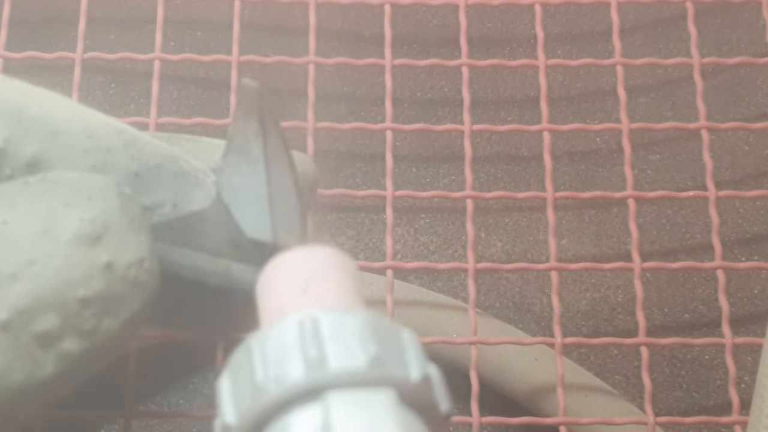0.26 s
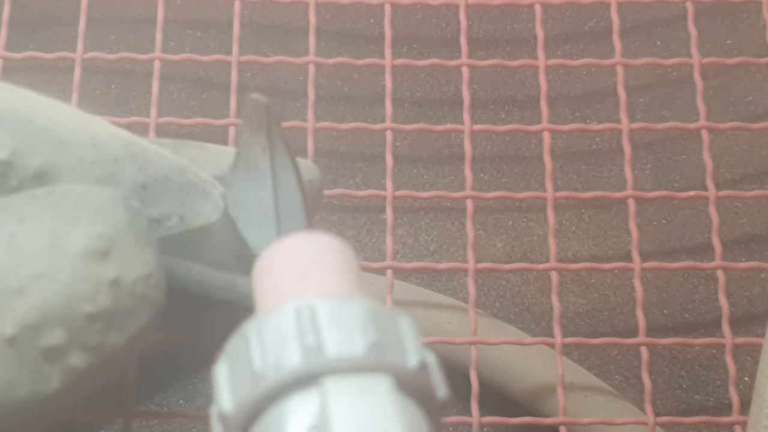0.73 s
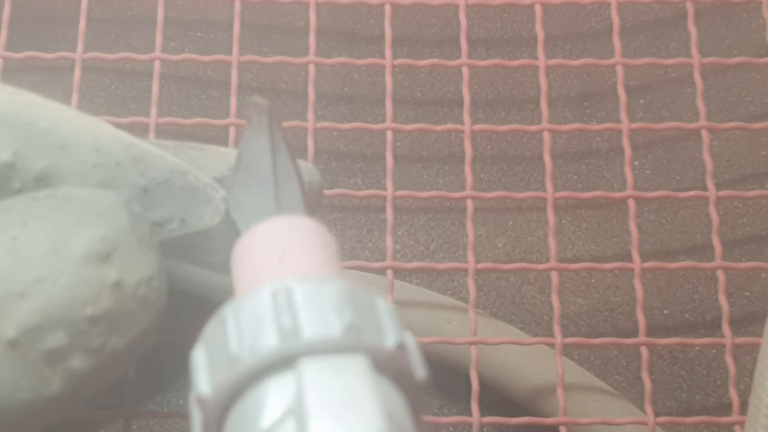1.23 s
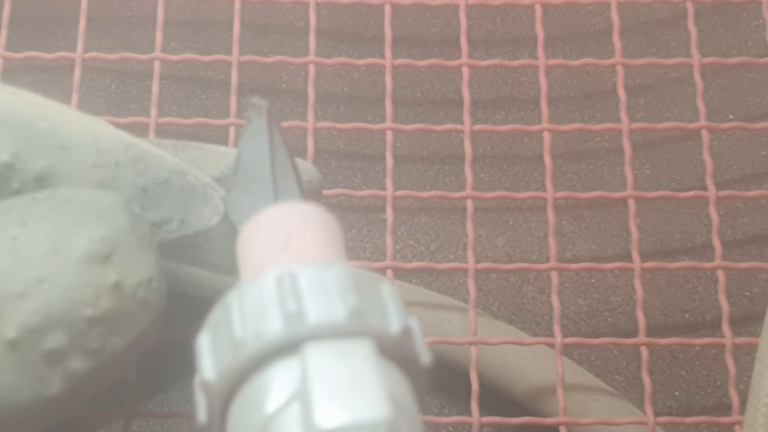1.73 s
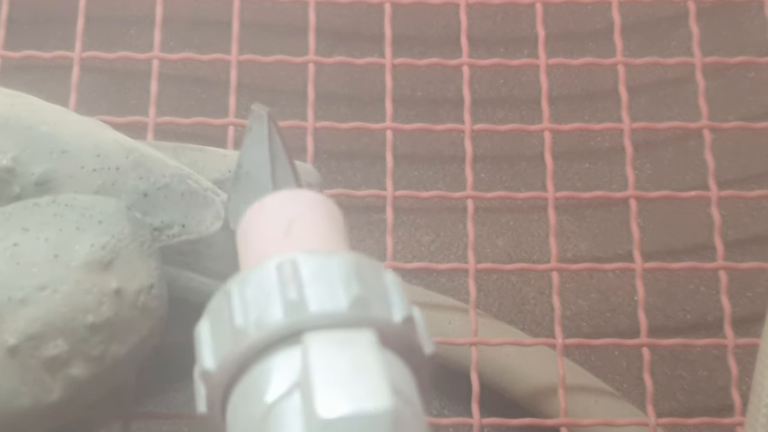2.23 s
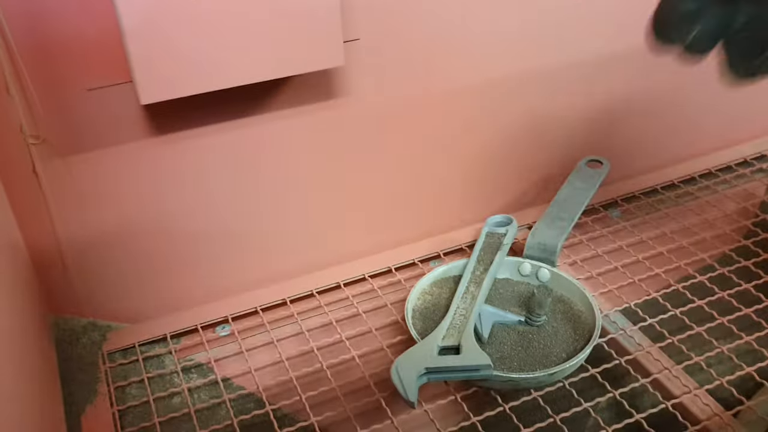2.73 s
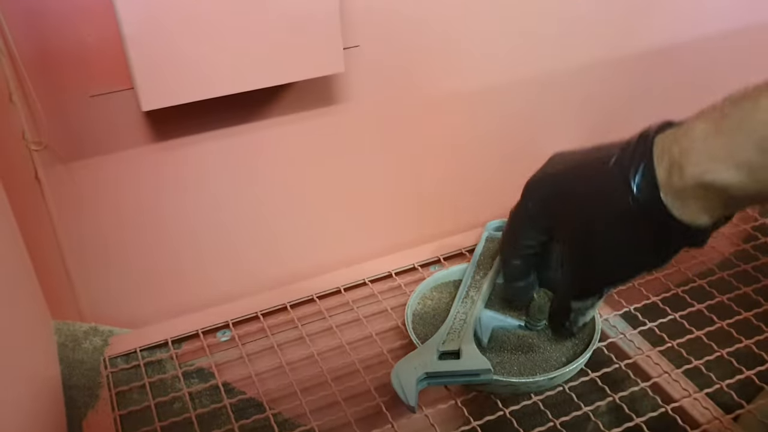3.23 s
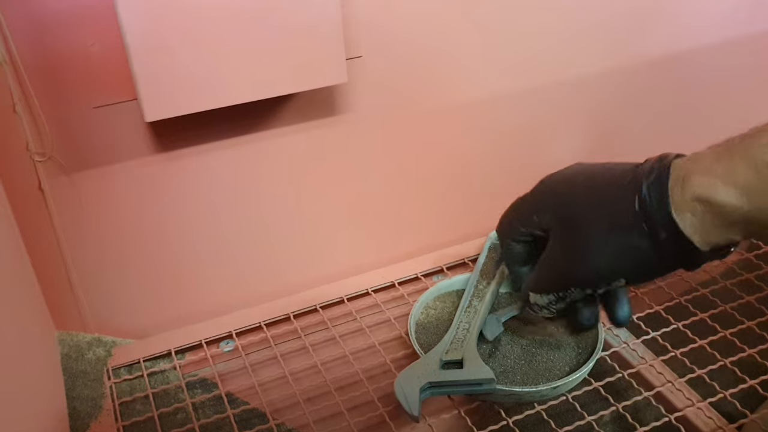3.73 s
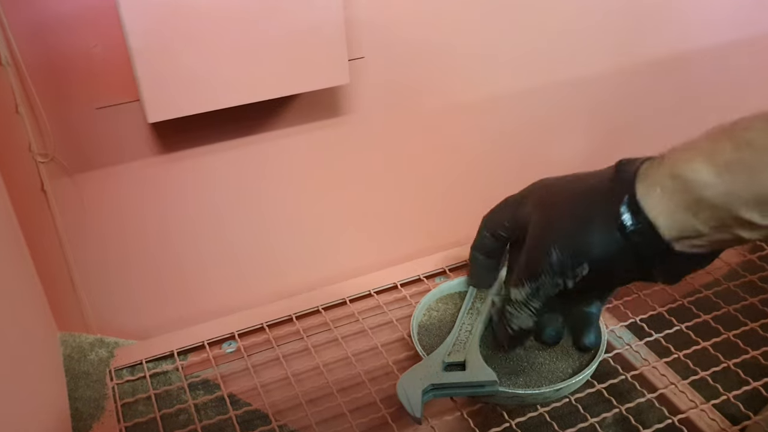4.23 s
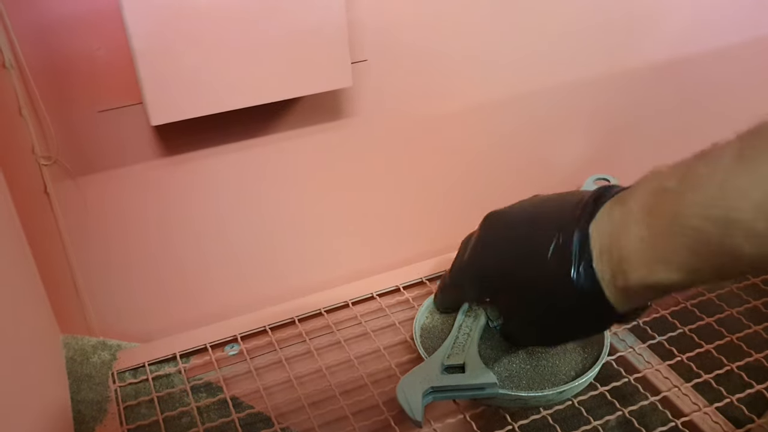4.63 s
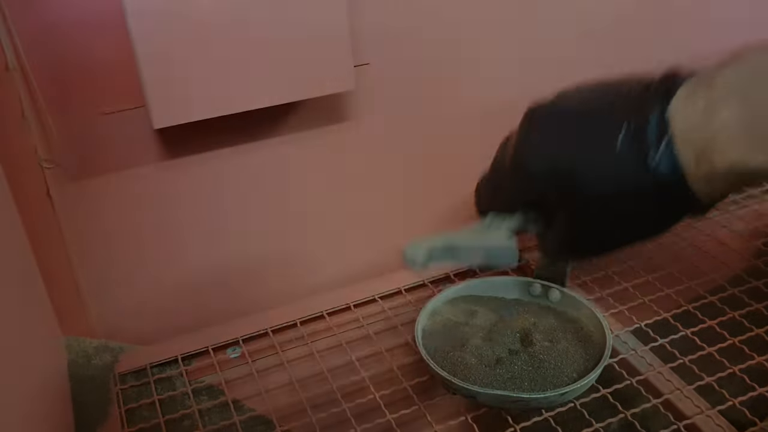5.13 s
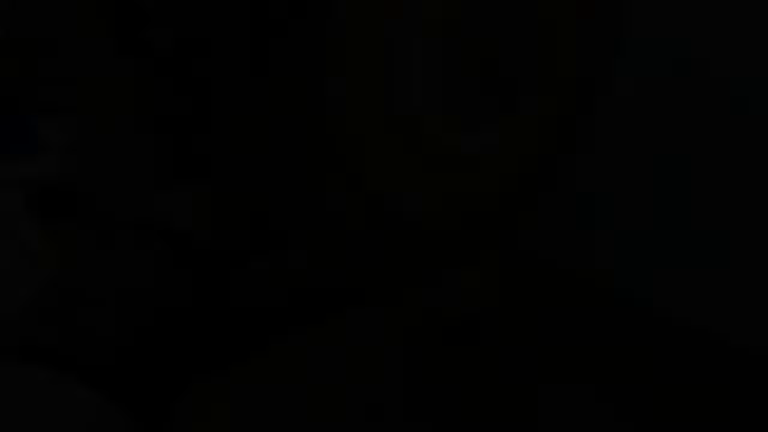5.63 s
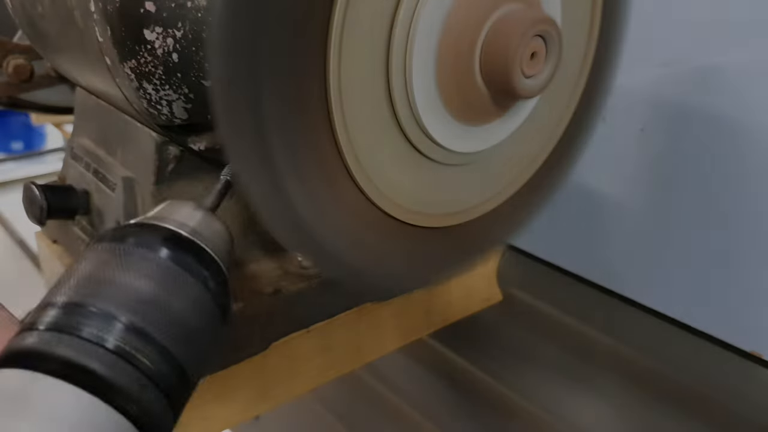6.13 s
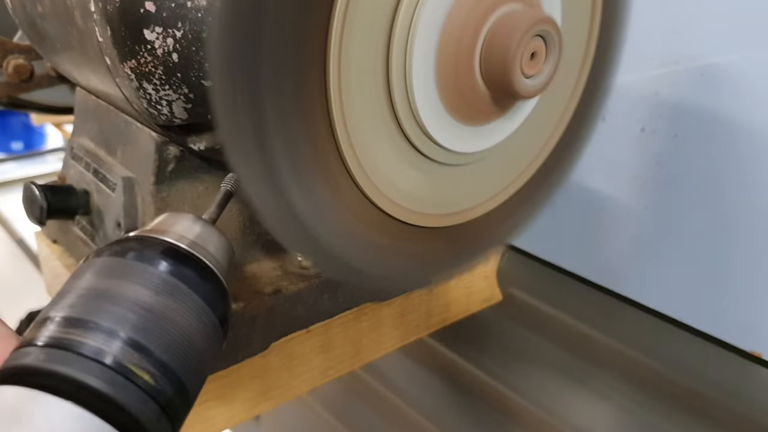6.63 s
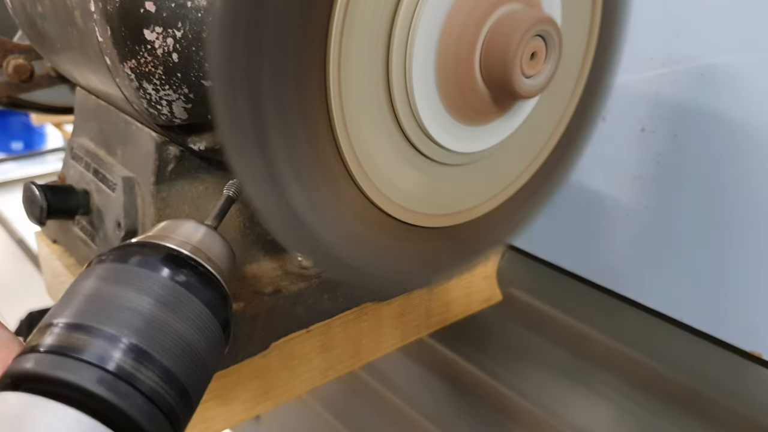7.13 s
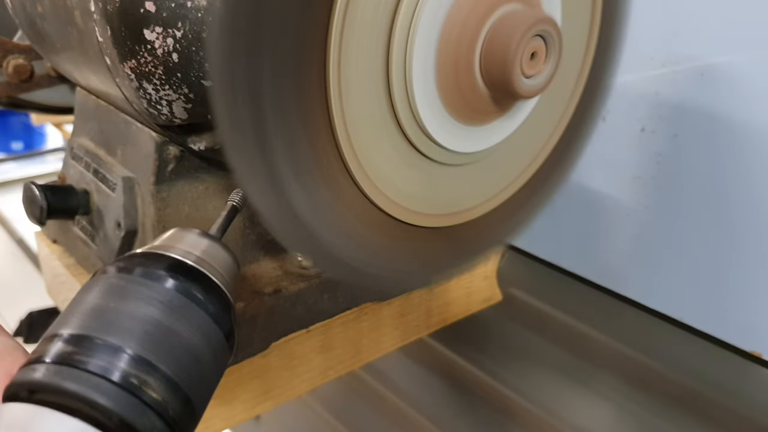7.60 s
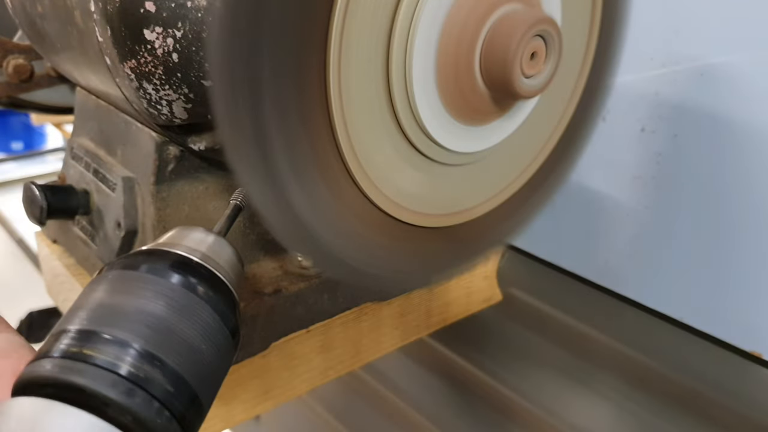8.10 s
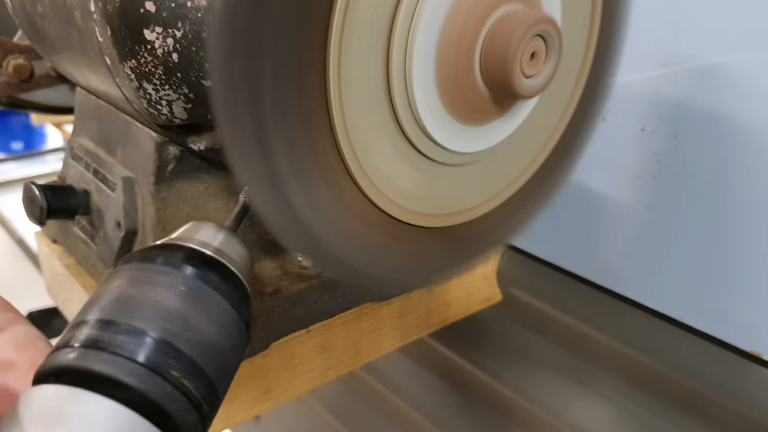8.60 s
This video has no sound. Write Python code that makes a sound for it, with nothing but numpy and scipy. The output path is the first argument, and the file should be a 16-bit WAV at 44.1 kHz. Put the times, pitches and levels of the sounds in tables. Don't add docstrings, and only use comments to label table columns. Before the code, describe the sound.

Grit blasts hissing inside a resonant steel cabinet, then small steel parts clink and scrape in a gritty pan, then a humming grinder brushes metal.

```python
import sys
import numpy as np
from scipy import signal
from scipy.fft import rfft, irfft, next_fast_len
from scipy.io import wavfile
from scipy.ndimage import uniform_filter1d

SR = 44100
rng = np.random.default_rng(int(sys.argv[2]) if len(sys.argv) > 2 else 0)


def gain_from_db(level_db):
    decades = np.asarray(level_db, float) / 20
    return 10 ** decades


def put_to_file(sound):
    columns = np.atleast_2d(sound).T
    safe = np.clip(columns, -1, 1)
    whole_steps = np.round(safe * 32767)
    wavfile.write(sys.argv[1], SR, whole_steps.astype(np.int16))


N = 390662

CUTS = (2.760, 5.743, 5.759)

# frequency in Hz, width in Hz, level in dB.
CABINET_MODES = [(105.43, 16.73, -11), (114, 9.98, -9.5), (277.42, 28, -7), (390, 37, -11.5),
                 (460, 34.67, 0.5), (644, 27.18, -6.5), (702.58, 33, -3), (750, 17, -6), (799.1, 8.9, -3),
                 (989, 16.19, -6.5), (1350, 390, -16)]
# frequency in Hz, density in dB per Hz.
BOOM_SPECTRUM = [(15, -46), (25, -9.5), (101, -3), (179, -18), (270, 11.5), (341, -3.5), (462, -16.5),
                 (1800, -8.5), (2340, -49), (3960, -120)]
# frequency in Hz, density in dB per Hz.
JET_SPECTRUM = [(710, -5.5), (1200, -9), (1310, -4.5), (1700, -10.5), (2000, -4.5), (3870, 0.5), (4130, -1),
                (4410, 1.5), (6030, 0.5), (6510, 1.5), (9010, -9), (11100, -6.5), (13500, -2.5),
                (15200, -4), (16000, -29.5)]
# frequency in Hz, correlation from -1 to 1.
BLAST_ALIKE = [(60, 0.98), (130, 0.8457), (290, 0.9438), (640, 0.2192), (1410, -0.03), (3100, -0.0193),
               (6820, -0.11), (15000, 0.054)]
# frequency in Hz, left minus right in dB.
BLAST_PAN = [(60, -3), (110, -2), (200, -2.5), (380, 2), (700, -1.5), (1290, -2), (2380, 1.5), (4400, -5),
             (8120, 0.5), (15000, 0.5)]
# multiple of the shaft rate, level in dB.
FAN_ORDERS = [(1, -52), (12, -51)]

# frequency in Hz, density in dB per Hz.
SHOP_SPECTRUM = [(12, -50), (20, -15), (53, -6.5), (74, -7), (101, -4.5), (158, -18), (367, -25.5),
                 (802, -37.5), (923, -28.5), (1000, -39.5), (1120, -35), (1370, -40.5), (6360, -49),
                 (8890, -57.5), (16000, -50)]
# frequency in Hz, correlation from -1 to 1.
SHOP_ALIKE = [(60, 1), (130, 0.9), (290, 0.8), (640, -0.19), (1410, -0.09), (3100, 0), (6820, 0.24),
              (15000, 0.13)]
# frequency in Hz, level in dB.
DUCT_TONES = [(742.9, -79.5), (839.8, -86), (936.7, -89.5), (1120, -80), (1260, -88.5)]

# time in seconds, ring peak in dB, dull knock in dB, bright crack in dB,
# freedom to ring from 0 to 1.
PART_HITS = [(3.0994, -60.5, -72, -74, .3), (3.1314, -59, -59, -76, .3), (3.2314, -63, -65, -77, .3),
             (3.608, -45, -59, -48, .3), (3.7462, -12.5, -50, -25.5, 0.49), (3.885, -45, -43.5, -56, .3),
             (4.0395, -33.5, -45.5, -46.5, .36), (4.3794, -51, -67, -41.5, .3),
             (4.6035, -17.5, -28, -39.5, 0.25), (4.6486, -37, -40, -45.5, 0.26),
             (4.757, -25.5, -48, -50, 0.48), (5.0816, -45.5, -80, -53.5, 0.53)]
SPANNER_HITS = [
    (4.496, -14, -37.5, -6.5, 0.85),
    (4.5003, -17.5, -48, -6, 0.8),
    (4.756, -27.5, -29, -45, 0.3),
    (4.9224, -44.5, -50, -43, .2),
]
# frequency in Hz, level in dB, 60 dB decay time in seconds.
PART_MODES = [(4750, -4, .04), (5055, 0, .07), (5443, -1, .07), (7181, -3, .09), (9475, -11, .07),
              (10250, -16, .15), (11340, -10, .05), (12300, -13, .07), (13560, -8, .05)]
# frequency in Hz, level in dB, 60 dB decay time in seconds.
SPANNER_MODES = [(2540, -8.5, 0.056), (4770, 2, 0.028), (5500, -8, 0.07), (6811.8, 1.5, 0.2109),
                 (8611.4, -56.5, 0.064), (9641.6, -22, 0.11), (9900, -15, 0.059), (11220, -14.5, 0.0151),
                 (11600, -18, 0.065), (12950, -23.5, 0.073)]
# frequency in Hz, level in dB, 60 dB decay time in seconds.
PAN_MODES = [(485, -3.5, .06), (751, 1, 0.036), (1030, -10, 0.025), (1274, -4.5, 0.022), (1450, 1, 0.041),
             (1850, 5, 0.026), (2155, -1.5, 0.091), (2504, 2, 0.076)]
# frequency in Hz, level in dB, 60 dB decay time in seconds.
RIM_MODES = [(3600, -9, .015), (4620, 0, .02), (5300, -1, .015), (5760, -5, .02), (6300, -5, .02),
             (7200, -6, .02)]
# start in seconds, length in seconds, level in dB, pitch of the touched spot in Hz.
RUBS = [(3.125, 0.45, -74.5, 750), (3.353, 0.09106, -58, 2120), (3.507, 0.13, -63.5, 2040),
        (3.634, 0.26, -66.5, 910), (3.757, .074, -59.5, 2015), (3.975, 0.12, -61, 500),
        (4.041, 0.056, -52, 556.3), (4.228, 0.097, -64, 900), (4.347, 0.057, -51.5, 1925),
        (4.51, 0.095, -66, 1190), (4.644, 0.03658, -56.5, 900), (4.741, 0.0194, -47.5, 1683),
        (4.875, 0.08, -59, 1525), (4.97, 0.055, -72, 1300), (5.084, .008, -64, 2500)]
# start in seconds, length in seconds, level in dB, pitch of the touched spot in Hz.
DRAGS = [
    (3.849, 0.13, -52, 1313),
    (4.098, 0.11, -46.5, 1410),
    (4.306, 0.067, -61, 1850),
    (4.419, 0.097, -44.5, 1730),
    (4.585, 0.01, -44.5, 902.7),
    (4.616, 0.024, -46, 723.1),
    (4.68, .033, -58, 550),
    (4.722, 0.049, -40, 1110),
    (4.796, 0.066, -55.5, 517),
    (4.941, .025, -45.5, 1450),
]
# level in dB, for pan ring, grit and fine grit in turn.
RUB_MIX_DB = (-4, -1, -1)
DRAG_MIX_DB = (2, -6.5, -10.5)
# start in seconds, level in dB, frequency in Hz, 60 dB decay time in seconds.
MESH_THUDS = [
    (3.135, -40.5, 197, 0.061),
    (4.61, -42, 148, 0.1472),
    (4.775, -30, 136.6, 0.16),
    (4.962, -39.5, 134, 0.1993),
]
# time in seconds, peak in dB.
DROPS = [
    (5.0599, -59.5),
    (5.1362, -68),
    (5.1676, -74.5),
    (5.2868, -70.5),
    (5.449, -74.5),
    (5.4959, -73.5),
    (5.5542, -65),
    (5.59, -70),
]
# frequency in Hz, level in dB, 60 dB decay time in seconds.
DROP_MODES = [(5317, -6, .012), (6400, -2, 0.01715), (7030, -5, .015)]

# multiple of the shaft rate, level in dB.
HUM_ORDERS = [(1, 2), (2, -30.5), (3, -2.5), (4, -18), (5, -15), (6, -20.5), (7, -36.5), (8, -12.5),
              (9, -21.5), (10, -20.5), (11, -23), (12, -15.5), (13, -28), (14, -74)]
# frequency in Hz, level in dB.
MAINS_TONES = [(100, -52), (500, -54), (600, -54)]
# frequency in Hz, density in dB per Hz.
FRAME_SPECTRUM = [(12, -33), (20, -7), (60, -4), (79, -3), (97, -2.5), (151, -5), (199, -4.5), (344, -4),
                  (394, -5.5), (743, -14), (1200, -24), (1560, -59), (2640, -120)]
# frequency in Hz, density in dB per Hz.
WIRE_SPECTRUM = [(470, -46), (800, -13.5), (1210, -5), (1370, -6.5), (1570, -4.5), (1970, -3.5), (2380, -3),
                 (2850, -10.5), (3260, -3.5), (4800, -6), (5940, -2.5), (9100, -8), (12800, -3.5),
                 (15200, -2), (16000, -23.5)]
# frequency in Hz, width in Hz, level in dB.
GUARD_MODES = [(1074.3, 75, -15), (1386, 73, -3.5), (1790, 51, -6), (1939.2, 100, 0), (2238, 150, -6.5)]
# frequency in Hz, width in Hz, level in dB.
SHANK_MODES = [(2552, 33, 3.5), (2617, 76, -0.5), (2840, 310, -9.5)]
# frequency in Hz, correlation from -1 to 1.
GRIND_ALIKE = [(60, 0.92), (130, 1), (290, 0.11), (640, 0.23), (1410, 0.04), (3100, -0.21), (6820, 0.11),
               (15000, -0.068)]
# frequency in Hz, left minus right in dB.
GRIND_PAN = [(60, -4.5), (110, -0.5), (200, -1.5), (380, -2), (700, -0.5), (1290, -2), (2380, 4), (4400, 1),
             (8120, 2), (15000, -1.5)]

T = np.arange(N) / SR
SIZE = next_fast_len(N)
HZ = np.maximum(np.arange(SIZE // 2 + 1) * SR / SIZE, 1)

FAN_HZ = 524.7
BOOM_DB, JET_DB, JET_TOP_DB = -41, -41, -46.5
AIM_S, AIM_TURN_S, AIM_DB, AIM_TOP_SHARE = 1.39, 0.03, 2, 1.6
RUMBLE_DB, AIR_DB, SHOP_SAG_DB_PER_S = -56.5, -65.5, 2.4162
SWAY_S, SWAY_LENGTH_S, SWAY_RUMBLE_DB, SWAY_AIR_DB = 4.65, 0.081, 6, 19.5
SPANNER_RATTLE_S, PART_RATTLE_S = 0.0027, 0.005
LEFT_DB = 14
TURN = 888
HUM_DB = -34
PRESS_S, PRESS_RISE_S, PRESS_CREEP_PER_S = 6.35, 0.12, 0.121
FRAME_DB, GUARD_DB, SHANK_DB, WIRE_DB = -41.5, -41.5, -42, -36.5
GUARD_PRESS_DB, SHANK_PRESS_DB, WIRE_PRESS_DB = 6.5, 5, 1
TOP_HZ = 15990


def over_hz(table):
    hz, value = np.transpose(table)
    return np.interp(np.log(HZ), np.log(hz), value)


def resonances(peaks):
    power = 0
    for hz, width, db in peaks:
        detuning = (HZ ** 2 - hz ** 2) / (HZ * width)
        power = power + gain_from_db(2 * db) / (1 + detuning ** 2)
    return np.sqrt(power)


def walk(rate):
    hold = int(SR / rate)
    steps = np.repeat(rng.standard_normal(N // hold + 1), hold)
    return 1.39 * uniform_filter1d(steps, hold)[:N]


def noise(flicker_db=1.0, rate=12):
    return rng.standard_normal(N) * gain_from_db(flicker_db * walk(rate))


def pair(a, b, gain, alike, pan_db=0):
    alike = np.clip(alike, -1, 1)
    mid = rfft(a, SIZE) * np.sqrt(1 + alike)
    side = rfft(b, SIZE) * np.sqrt(1 - alike)
    left = (mid + side) * gain_from_db(pan_db / 2)
    right = (mid - side) * gain_from_db(-pan_db / 2)
    y = irfft(np.array([left, right]) * gain, SIZE)[:, :N]
    return y / np.sqrt(np.mean(y.mean(0) ** 2))


def grains(rate, spread_db):
    return (rng.random(N) < rate / SR) * rng.standard_normal(N) * gain_from_db(spread_db * rng.exponential(size=N))


def unit(x):
    return x / np.sqrt(np.mean(x ** 2))


def band(x, lo_hz, hi_hz):
    return signal.sosfilt(signal.butter(2, (lo_hz, hi_hz), "bandpass", fs=SR, output="sos"), x)


def ring(x, hz, t60):
    r, w = 1000 ** (-1 / (t60 * SR)), 2 * np.pi * hz / SR
    return signal.lfilter([np.sin(w)], [1, -2 * r * np.cos(w), r * r], x)


def body(x, modes, scatter_db, free):
    shares = gain_from_db(scatter_db * rng.standard_normal((len(modes), 2, 1)))
    out = 0
    for share, (hz, db, t60) in zip(shares, modes):
        level = share * gain_from_db(db) / np.sin(2 * np.pi * hz / SR) ** 0.5
        out = out + level * ring(x, hz, t60 * free)
    return out


def blasting():
    aim_db = AIM_DB * np.clip((T - AIM_S) / AIM_TURN_S + 0.5, 0, 1)
    alike, pan_db = over_hz(BLAST_ALIKE), over_hz(BLAST_PAN)
    walls = resonances(CABINET_MODES) + gain_from_db(over_hz(BOOM_SPECTRUM) - 13)
    boom = pair(noise(0.64, 7), noise(), walls, alike, pan_db)

    top = 1 / (1 + (8000 / HZ) ** 8)
    hiss = gain_from_db(over_hz(JET_SPECTRUM))
    jet = pair(noise(0.25, 15), noise(0.39, 23.5), hiss * np.sqrt(1 - top), alike, pan_db)
    fine = pair(noise(0.2, 27), noise(0.49, 13.6), hiss * np.sqrt(top), alike, pan_db)

    shaft = 2 * np.pi * np.cumsum(FAN_HZ * (1 + 0.00025 * walk(3.6))) / SR
    whine = sum(gain_from_db(db + walk(5.4)) * np.sqrt(2) * np.sin(k * shaft) for k, db in FAN_ORDERS)
    mains = gain_from_db(-59.5) * np.sin(2 * np.pi * 100 * T)
    jets = gain_from_db(JET_DB + aim_db) * jet + gain_from_db(JET_TOP_DB + AIM_TOP_SHARE * aim_db) * fine
    return gain_from_db(BOOM_DB) * boom + jets + whine + mains


def shop():
    sag_db = SHOP_SAG_DB_PER_S * (CUTS[0] - T)
    sway = np.exp(-((T - SWAY_S) / SWAY_LENGTH_S) ** 2)
    rumble_db = RUMBLE_DB + sag_db + SWAY_RUMBLE_DB * sway
    air_db = AIR_DB + 0.74 * sag_db + SWAY_AIR_DB * sway
    low = 1 / (1 + (HZ / 300) ** 6)
    gain, alike = gain_from_db(over_hz(SHOP_SPECTRUM)), over_hz(SHOP_ALIKE)
    rumble = pair(noise(), noise(), gain * np.sqrt(low), alike)
    air = pair(noise(), noise(), gain * np.sqrt(1 - low), alike)
    ducts = 0
    for hz, db in DUCT_TONES:
        level = gain_from_db(db - 1 + 2 * walk(5.3))
        ducts = ducts + level * np.sin(2 * np.pi * np.cumsum(hz + 2.4 * walk(4.3)) / SR)
    return gain_from_db(rumble_db + 1.5) * rumble + gain_from_db(air_db) * air + gain_from_db(0.75 * sag_db) * ducts


def hits(events, modes, scatter_db, rattle_s):
    out, t = np.zeros((2, N)), T[:SR // 5]
    for s, ring_db, knock_db, crack_db, free in events:
        push = rng.standard_normal((2, len(t))) * (1 - np.exp(-t / 0.00036)) * np.exp(-t / rattle_s)
        push[:, 30] += 3.5
        push[1] = 0.42 * push[1] + 0.5 * push[0]
        steel = body(push, modes, scatter_db, free)
        steel = steel / np.abs(steel).max(1, keepdims=True) + 0.12 * band(push, 1700, 8000)
        knock = unit(body(push, PAN_MODES[1:], 3, 0.41)) + 0.5 * unit(band(push, 650, 3000))
        knock = band(knock, 610, 3500)
        crack = band(push, 12300, 13650)
        i = int(s * SR) - 30
        for layer, db in ((steel, ring_db), (knock, knock_db + 5.5), (crack, crack_db - 5)):
            out[:, i:i + len(t)] += gain_from_db(db) * layer / np.abs(layer).max(1, keepdims=True)
    return out * gain_from_db(6 - (LEFT_DB + 4.5) * np.array([[0], [1]]))


def dragging(strokes, mix_db):
    out, jerk = np.zeros((2, N)), gain_from_db(1.6 * walk(90))
    crunch = np.array([jerk * (unit(grains(3000, 2.3)) + 0.76 * noise(2.0, 90)) for _ in range(2)])
    crunch[1] += 0.6 * crunch[0]
    for start, length, stroke_db, spot_hz in strokes:
        pan_db, grit_db, fine_db = stroke_db + np.array(mix_db)
        i, t = int((start - 0.006) * SR), T[:int((length + 0.06) * SR)]
        stroke = np.sin(np.pi * np.clip(t / (length + 0.016), 0, 1) ** 0.69) ** 0.65
        push = crunch[:, i:i + len(t)] * stroke
        shift = 1 + 0.03 * rng.standard_normal()

        spot_modes = [(hz * shift, db - 20 * abs(np.log2(hz / spot_hz)), t60) for hz, db, t60 in PAN_MODES]
        pan = unit(body(push, spot_modes, 1.1, 0.91))
        near = band(push, spot_hz / 1.3, spot_hz * 1.12)
        pan = unit(pan + 0.28 * unit(band(near, spot_hz / 1.62, spot_hz * 1.87)))

        rim_modes = [(hz * shift, db, t60) for hz, db, t60 in RIM_MODES]
        grit = unit(unit(body(push, rim_modes, 5.2, 1)) + 3.7 * unit(band(push, 2800, 7300)))

        push = crunch[:, -i - len(t):-i] * stroke
        fine = unit(band(push, 11000, 15000) + 0.21 * band(push, 9700, 14100))
        fill = np.sqrt(np.mean(stroke ** 2))
        out[:, i:i + len(t)] += fill * (gain_from_db(pan_db) * pan + gain_from_db(grit_db) * grit + gain_from_db(fine_db) * fine)
    return out * gain_from_db(5.5 - LEFT_DB * np.array([[0], [1]]))


def cabinet_echo(x, t60, wet_db):
    t = T[:int(t60 * SR)]
    tails = rng.standard_normal((2, SR))[:, :len(t)] * 1000 ** (-t / t60) / np.sqrt(t60 * SR / 14)
    return x + gain_from_db(wet_db) * signal.fftconvolve(x.mean(0, keepdims=True), tails, axes=1)[:, :N]


def thuds():
    out = np.zeros(N)
    for s, db, hz, t60 in MESH_THUDS:
        t = np.maximum(T - s, 0)
        out += gain_from_db(db) * np.sin(2 * np.pi * hz * t) * 1000 ** (-t / t60) * (1 - np.exp(-t / 0.0027))
    return out


def drops():
    x = np.zeros((2, N))
    for s, db in DROPS:
        x[:, int(s * SR)] = gain_from_db(db)
    x = x + gain_from_db(-86.5) * grains(400, 2.5) * (T > DROPS[0][0])
    return body(x, DROP_MODES, 1, 1) * gain_from_db(np.array([[3], [-3]]))


def bristles(keep, bunch, tuft):
    bunching = 1 + bunch * np.sin(2 * np.pi * np.arange(TURN) / TURN)
    turns = rng.standard_normal((N // TURN + 1, TURN)) * bunching
    turns = signal.lfilter([np.sqrt(1 - keep ** 2)], [1, -keep], turns, axis=0)
    turns[:, tuft] += 0.5 * np.sqrt(TURN) * gain_from_db(1.1 * rng.standard_normal(len(turns)))
    return turns.ravel()[:N]


def brushed(peaks, tuft, alike, pan_db):
    a, b = bristles(0.88, 0.17, tuft), bristles(0.92, 0.36, tuft - 5)
    return pair(a, b, resonances(peaks) * (HZ > 700), 1.5 * alike - 0.1, pan_db + 3)


def grinder():
    since = T - PRESS_S
    slack = 0.5 - 0.5 * np.tanh(since / PRESS_RISE_S) - PRESS_CREEP_PER_S * since
    alike, pan_db = over_hz(GRIND_ALIKE), over_hz(GRIND_PAN)
    shaft = 2 * np.pi * SR / TURN * T
    hum = 0
    for k, db in HUM_ORDERS:
        level = gain_from_db(HUM_DB + db + min(k / 7, 1.7) * walk(3.8)) * np.sqrt(2)
        tone = level * np.sin(k * shaft + 0.09 * k * (k - 1))
        order_pan_db = np.interp(np.log(k * SR / TURN), np.log(HZ), pan_db)
        hum = hum + tone * gain_from_db(order_pan_db * np.array([[0.5], [-0.5]]))
    mains = sum(gain_from_db(db) * np.sin(2 * np.pi * hz * T) for hz, db in MAINS_TONES)
    frame = pair(noise(), noise(), gain_from_db(over_hz(FRAME_SPECTRUM)), alike, pan_db)
    guard = brushed(GUARD_MODES, 220, alike, pan_db)
    shank = brushed(SHANK_MODES, 20, alike, pan_db)
    wires = pair(noise(0.24, 15), noise(0.6, 15), gain_from_db(over_hz(WIRE_SPECTRUM)), alike, pan_db)
    out = hum + mains + gain_from_db(FRAME_DB) * frame
    out = out + gain_from_db(GUARD_DB - GUARD_PRESS_DB * slack) * guard
    out = out + gain_from_db(SHANK_DB - SHANK_PRESS_DB * slack) * shank
    return out + gain_from_db(WIRE_DB - WIRE_PRESS_DB * slack) * wires


def scene():
    hand = hits(PART_HITS, PART_MODES, 2, PART_RATTLE_S) + hits(SPANNER_HITS, SPANNER_MODES, 1.5, SPANNER_RATTLE_S)
    hand = hand + dragging(RUBS, RUB_MIX_DB) + dragging(DRAGS, DRAG_MIX_DB)
    picking = shop() + cabinet_echo(hand, 0.025, -14) + thuds() + drops()
    first, second, third = CUTS
    fade = np.clip((second + 0.001947 - T) / 0.0049, 0, 1)
    return blasting() * (T < first) + picking * (T >= first) * fade + grinder() * (T >= third)


def low_pass(x):
    return signal.sosfilt(signal.butter(12, 17010, fs=SR, output="sos"), x)


def record(dry):
    top = np.where(HZ < TOP_HZ, 1, gain_from_db(-35.5 - (HZ - TOP_HZ) / 90))
    mix = irfft(rfft(dry, SIZE) * top, SIZE)[:, :N]
    return low_pass(mix)


dry = scene()
out = record(dry)
put_to_file(out)
```